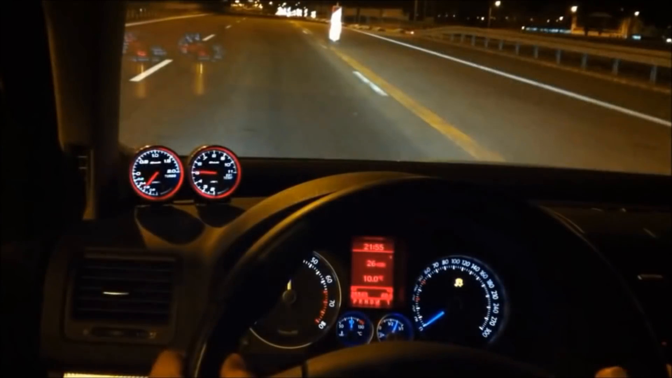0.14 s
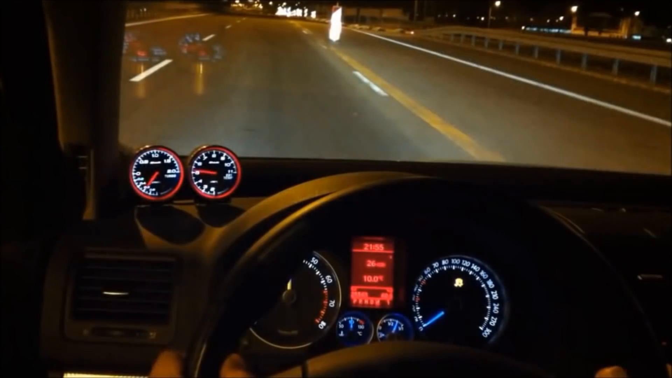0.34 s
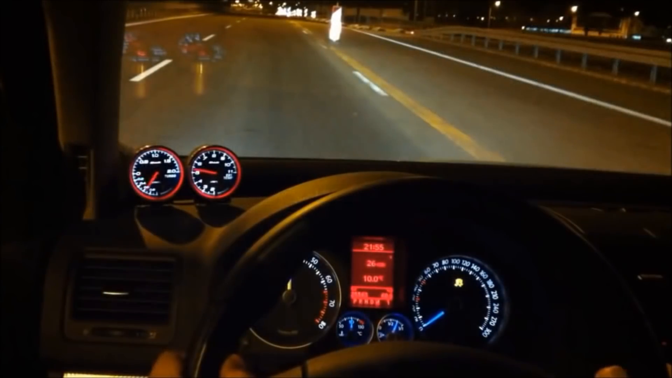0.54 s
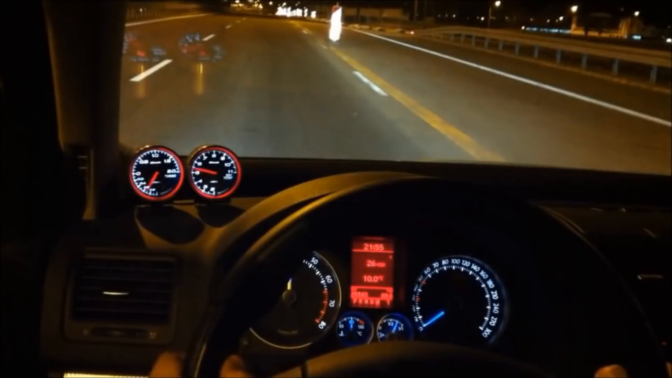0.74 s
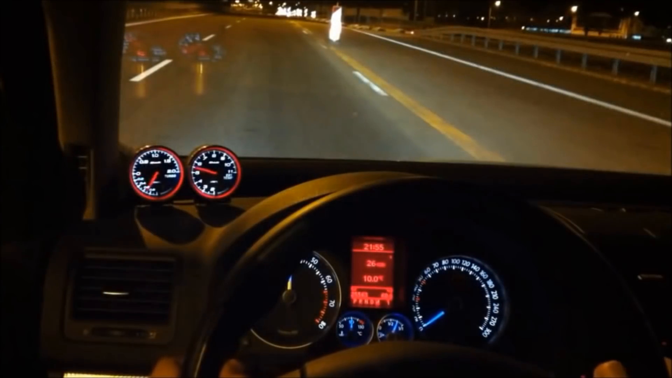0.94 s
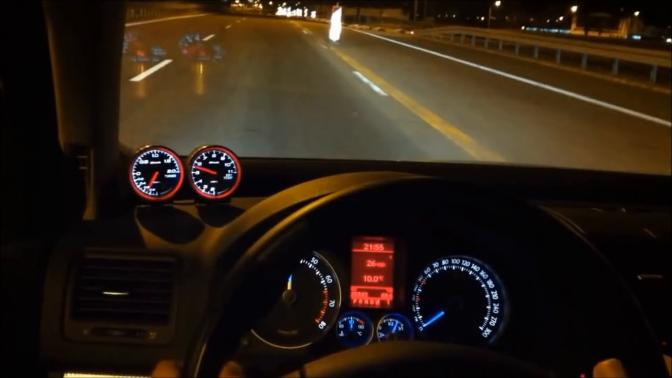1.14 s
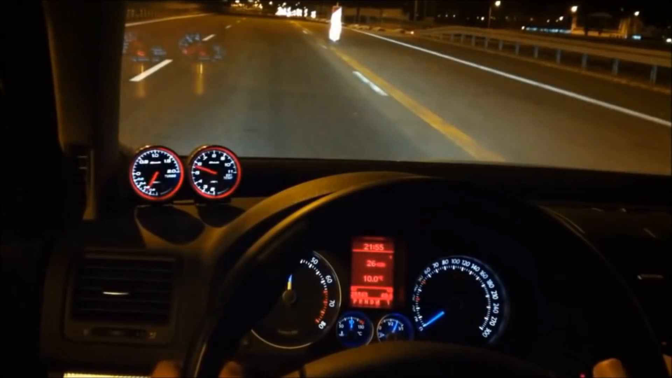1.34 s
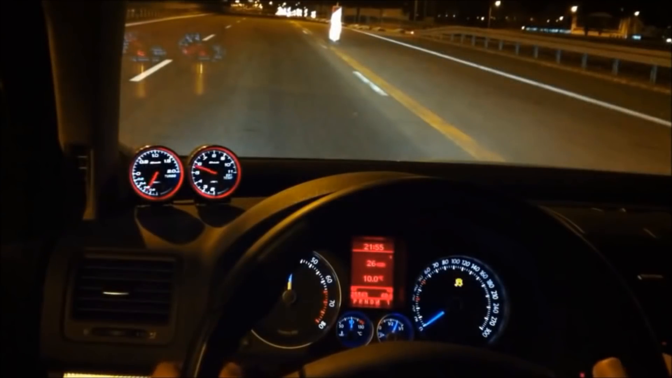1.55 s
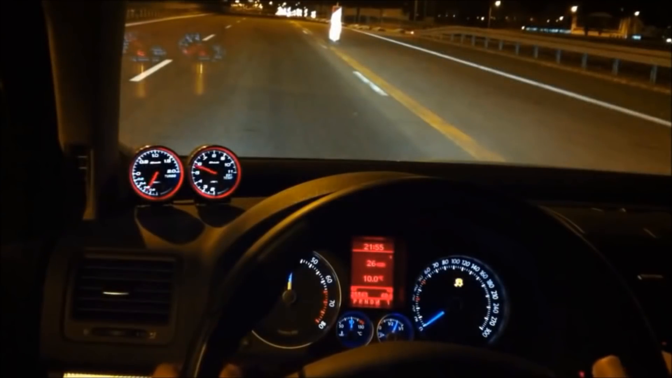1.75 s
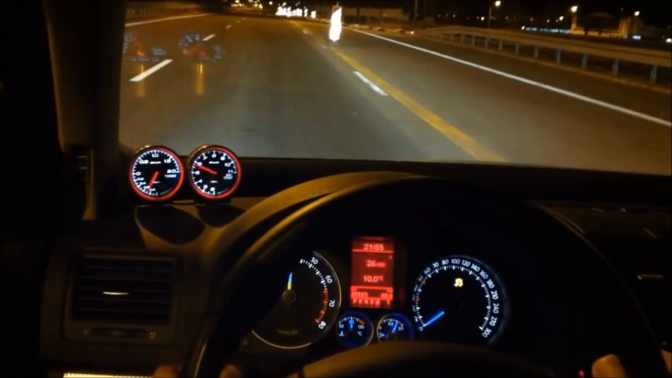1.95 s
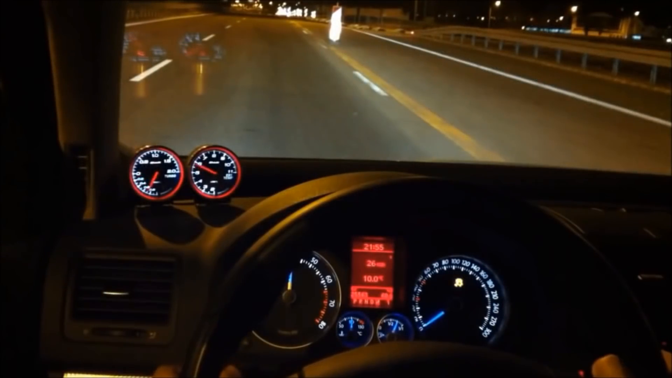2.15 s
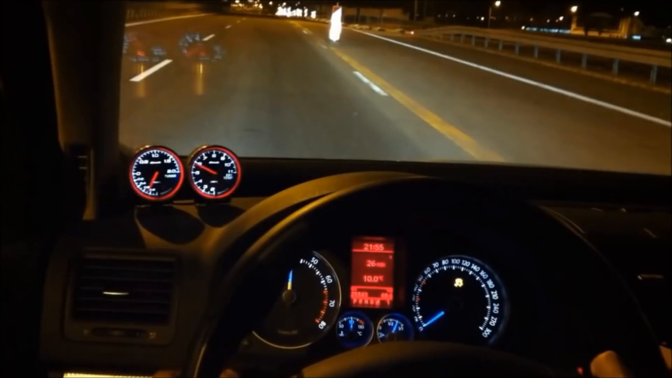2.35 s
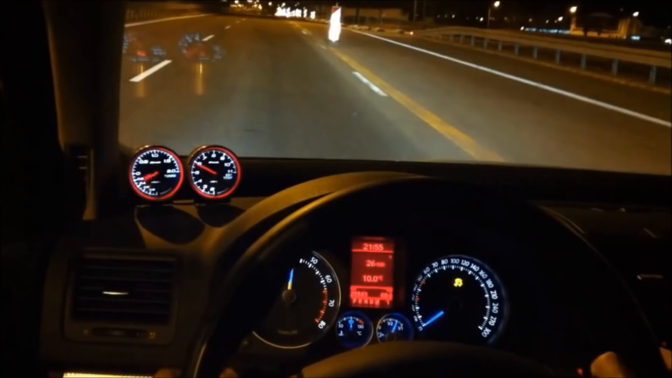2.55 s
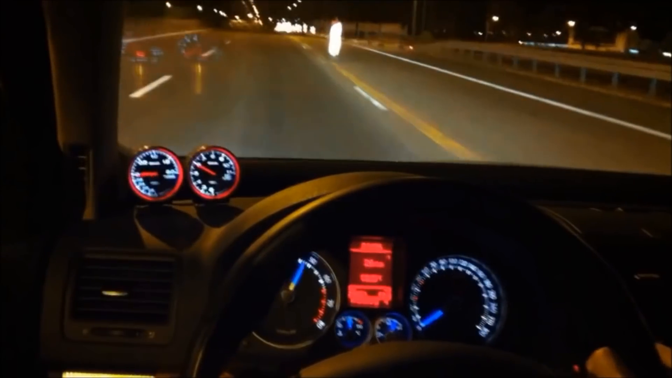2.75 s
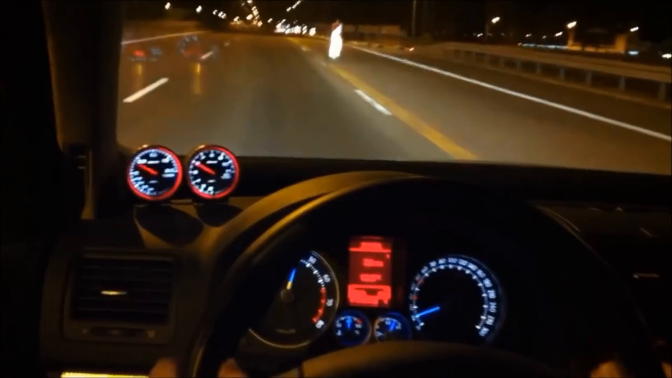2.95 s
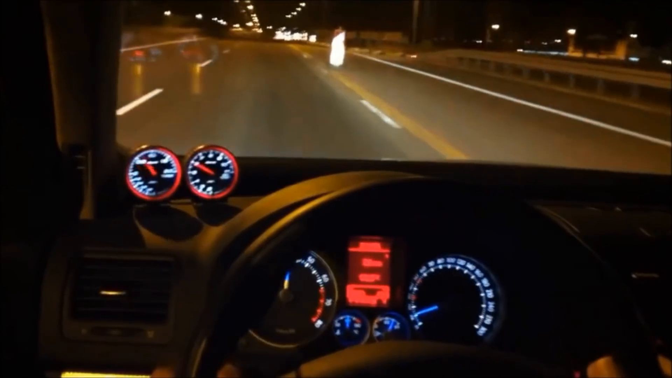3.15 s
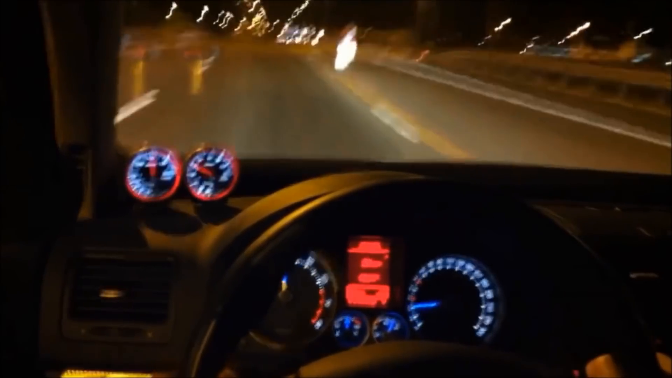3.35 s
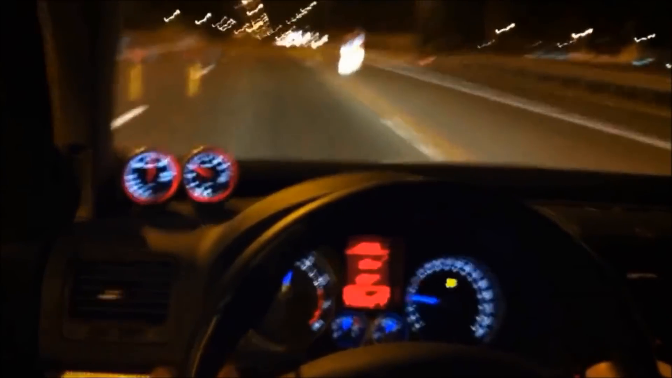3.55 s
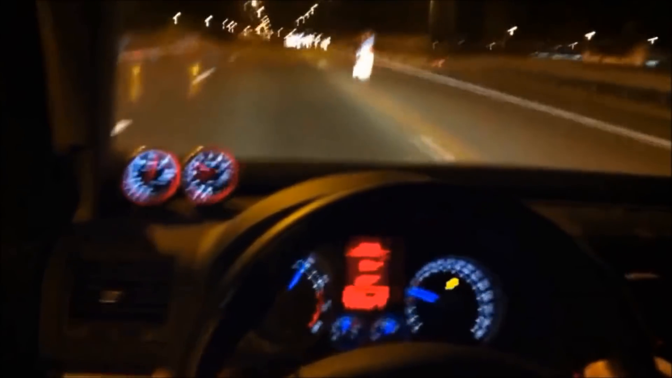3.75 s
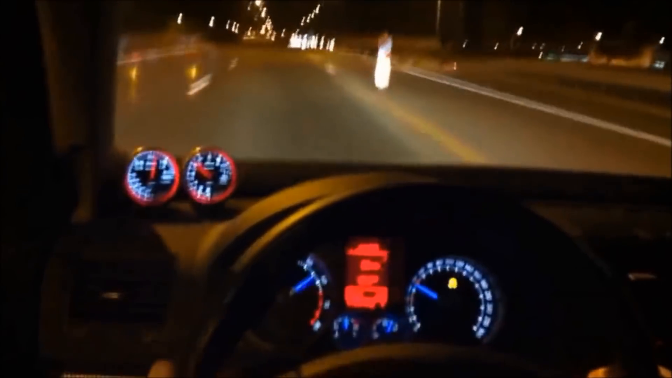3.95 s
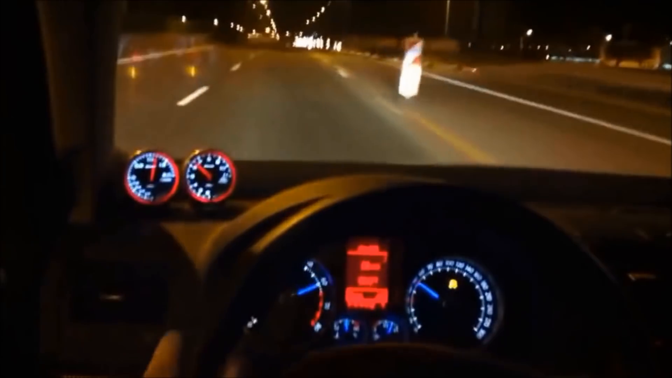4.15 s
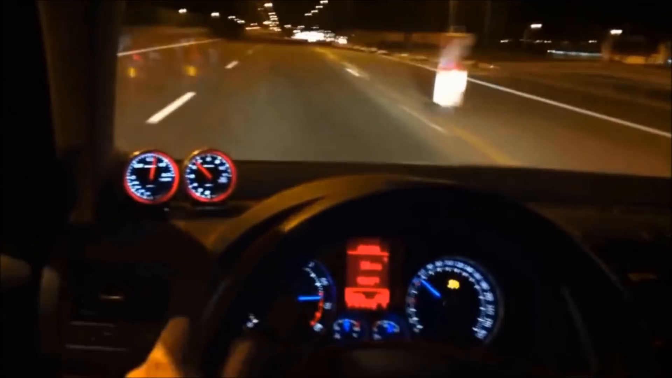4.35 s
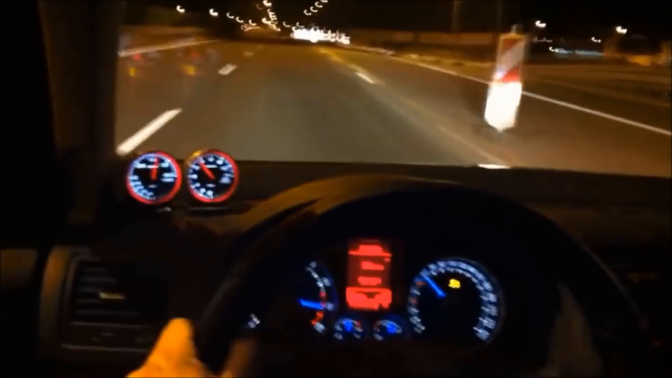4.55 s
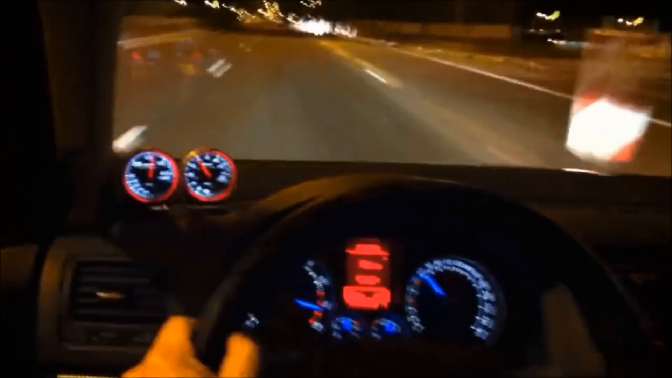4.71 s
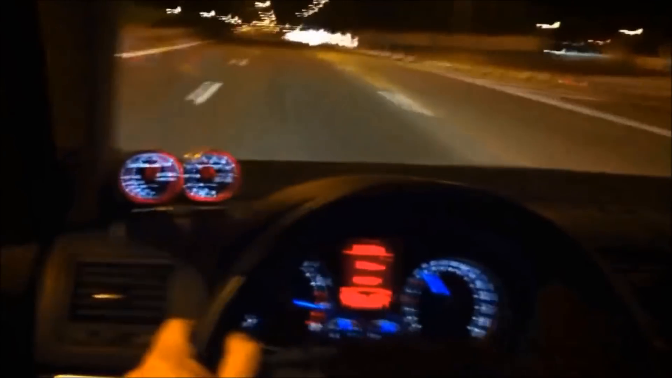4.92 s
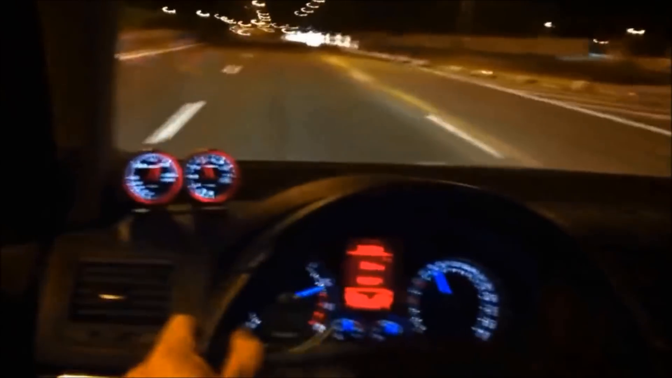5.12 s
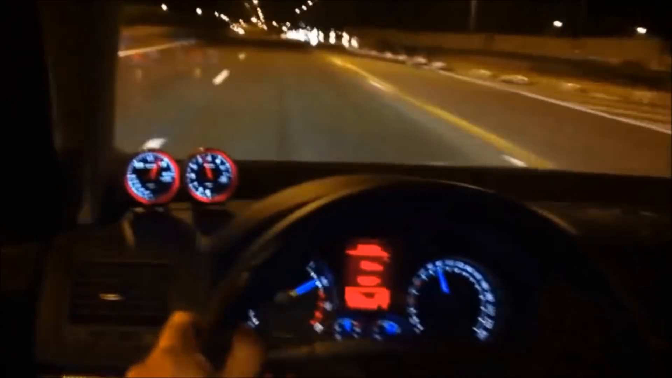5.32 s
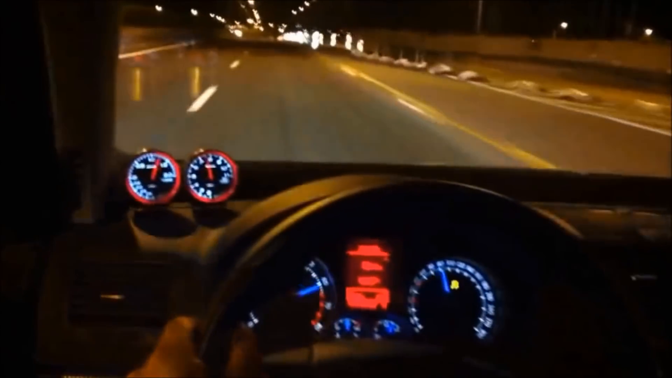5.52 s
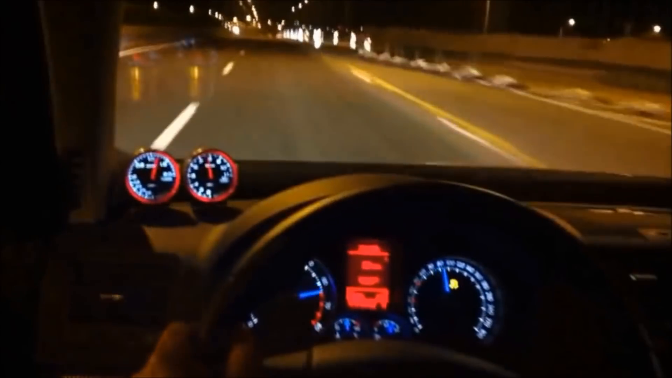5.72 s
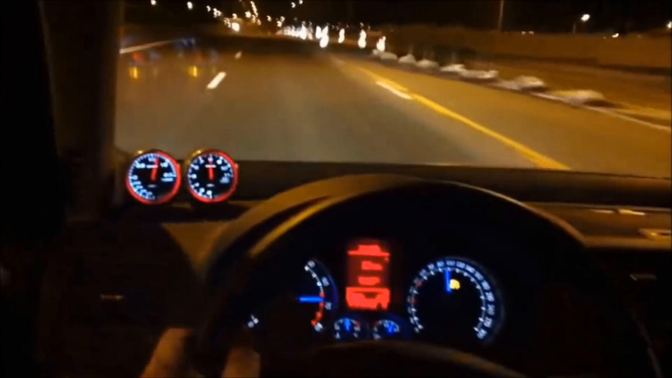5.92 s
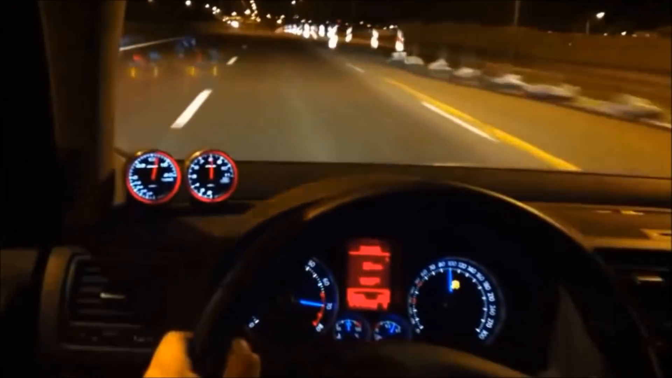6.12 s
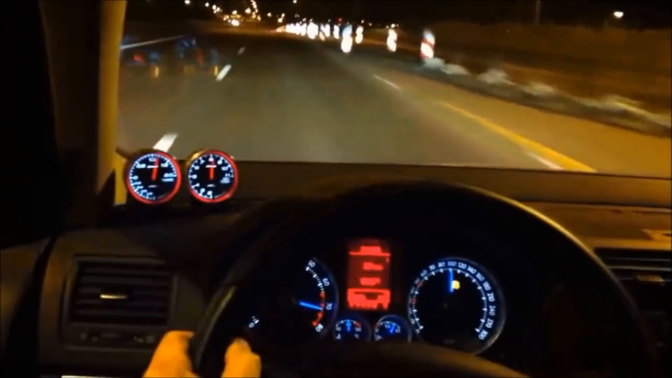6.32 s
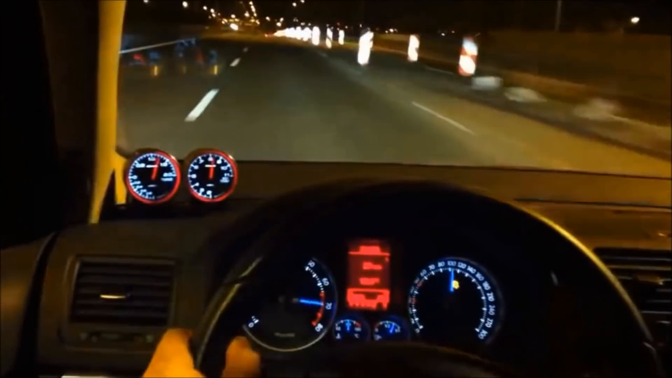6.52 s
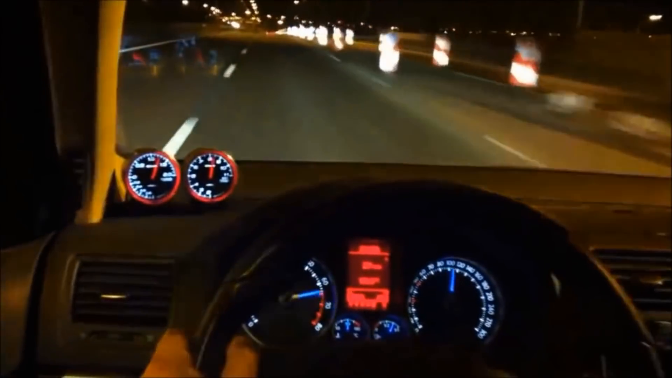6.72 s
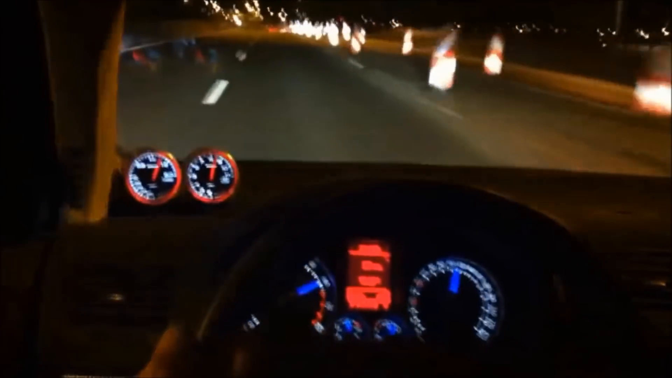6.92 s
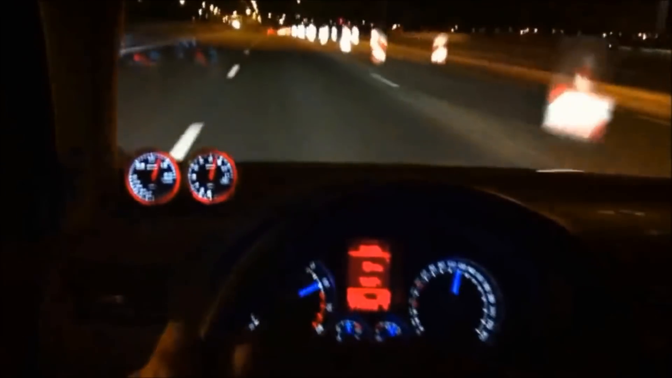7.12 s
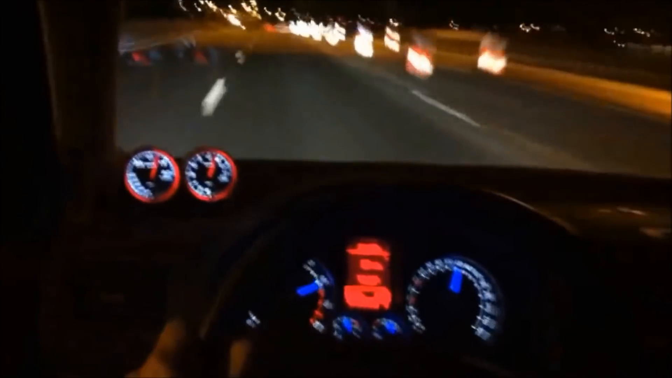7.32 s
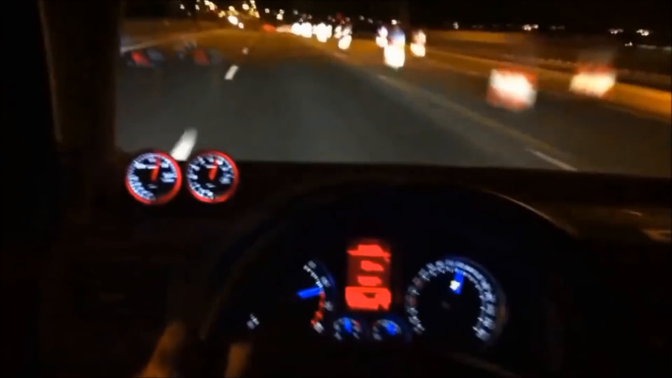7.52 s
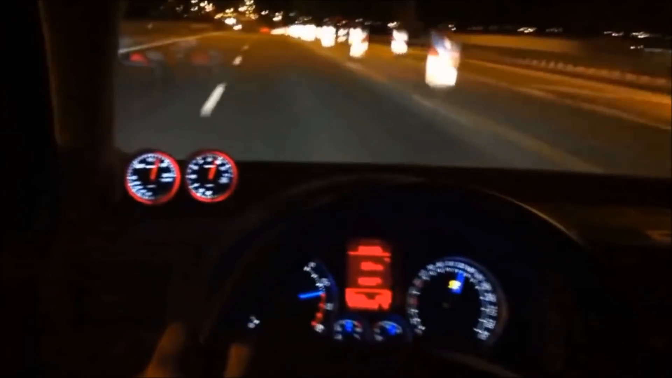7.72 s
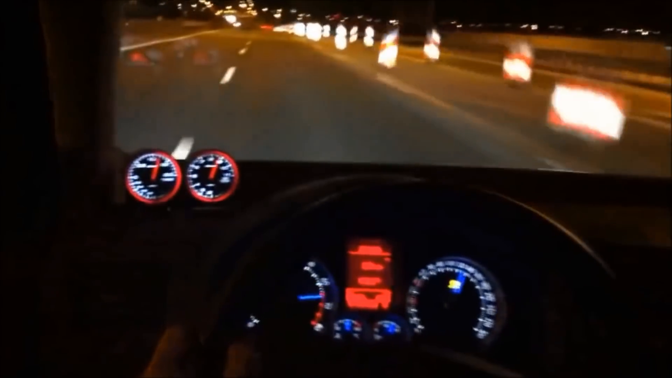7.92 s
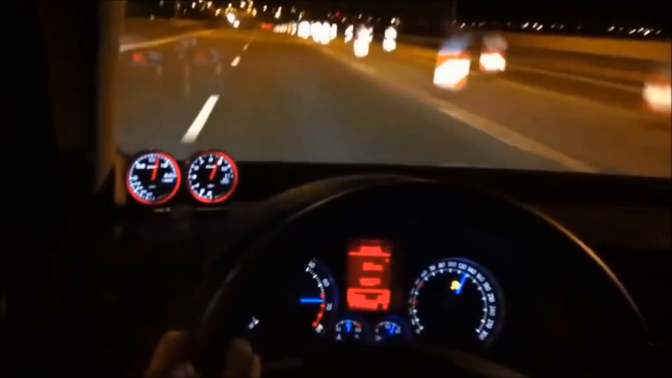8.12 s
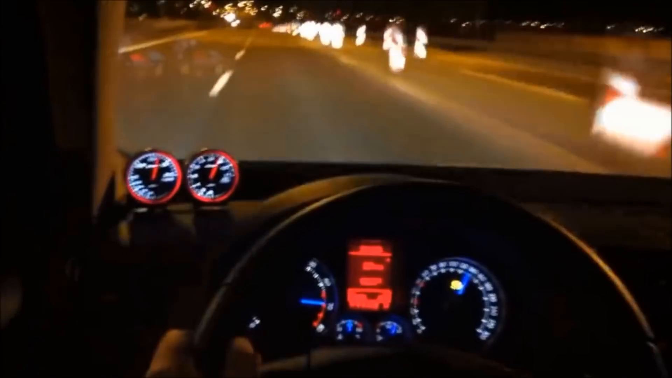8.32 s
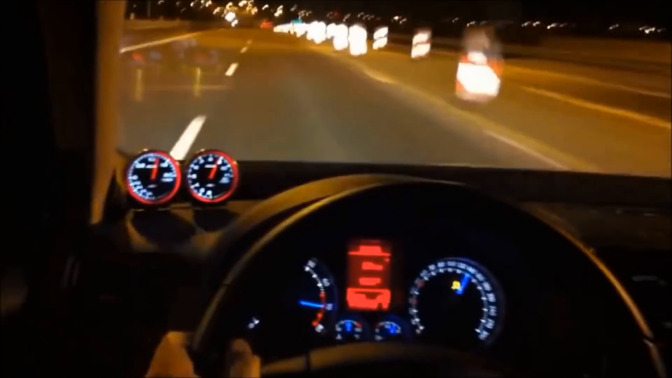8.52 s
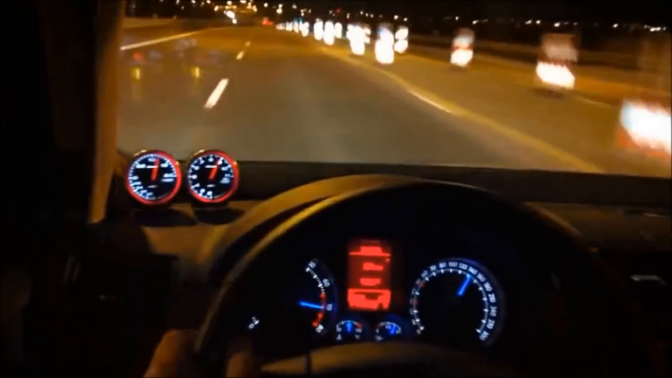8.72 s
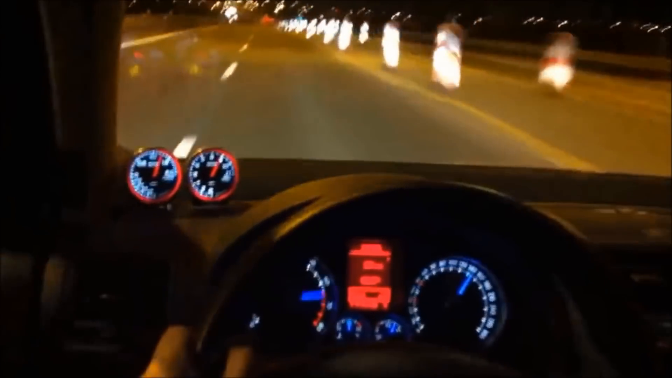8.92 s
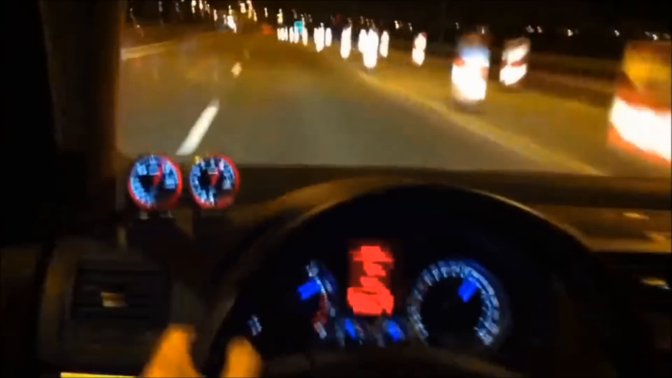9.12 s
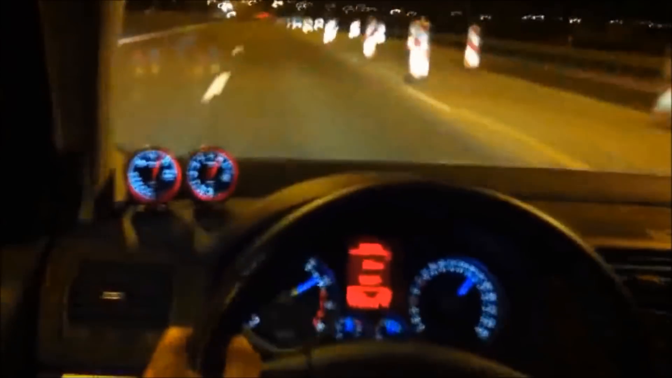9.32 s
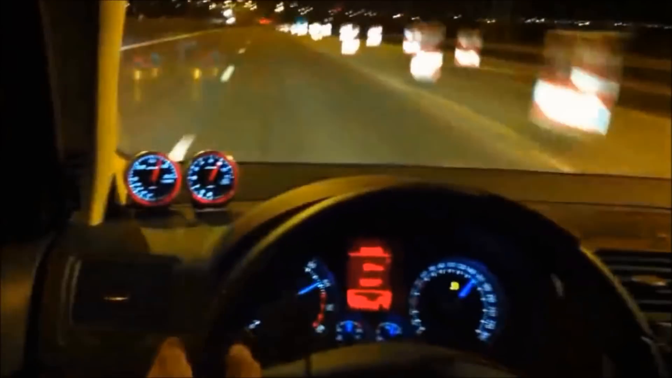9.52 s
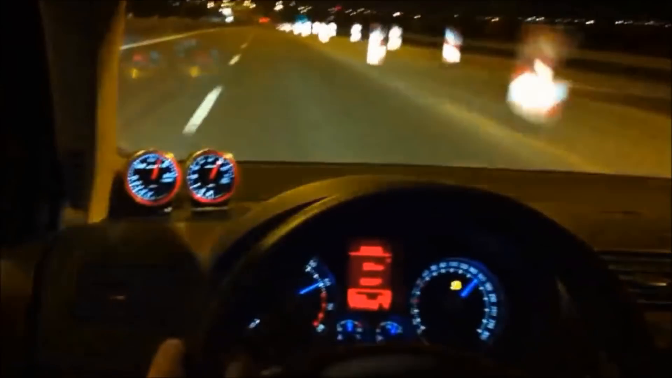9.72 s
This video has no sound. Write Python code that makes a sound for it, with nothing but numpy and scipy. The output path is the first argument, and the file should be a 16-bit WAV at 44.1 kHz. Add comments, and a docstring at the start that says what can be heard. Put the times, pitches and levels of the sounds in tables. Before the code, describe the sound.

A steady, booming engine drone fills a car's cabin, close around the microphone. After a few dry knocks from the controls, the car lurches away with low shudders and rattling trim. The engine falters, pops, then climbs to its limit, where the exhaust bangs several times. Three gear changes follow, the pitch dropping and rising again each time, over swelling road rumble, rushing air and a very faint turbo whistle.

```python
"""A turbocharged six-cylinder car launches at night; one microphone inside, at the driver's seat.
First the engine is held at 4000 rpm, its exhaust booming in the cabin. The controls knock within reach,
and at 2.6 s the car is let go: the body shudders, loose trim buzzes and the engine bogs, stutters and bangs.
It spins up to the rev limiter, where unburnt fuel bangs in the exhaust again. From 5 s it pulls through
three upshifts, while road noise grows around the seat and the turbo whistles faintly."""
import sys
import numpy as np
from scipy import signal
from scipy.fft import rfft, irfft, next_fast_len
from scipy.io import wavfile
from scipy.ndimage import uniform_filter1d, minimum_filter1d

SR = 44100
rng = np.random.default_rng(int(sys.argv[2]) if len(sys.argv) > 2 else 0)


def wrap_up_sound(samples):
    """Save the sound to the file named by the first command line argument, as 16-bit audio."""
    columns = np.atleast_2d(samples).T
    # keep every value between -1 and 1, then stretch to whole-number steps
    tamed = np.clip(columns, -1, 1)
    steps = np.round(tamed * 32767).astype(np.int16)
    wavfile.write(sys.argv[1], SR, steps)


N = 434826
TIME = np.arange(N) / SR
HOLD_HZ = 200   # firings per second at 4000 rpm

# Firing tone at the seat while the car stands: time_s, level_db
HELD_BOOM = [(0, -23.5), (.25, -18.5), (1.05, -26), (2.2, -26), (2.62, -26)]
# Exhaust resonances under load, heard from the seat: pitch_hz, level_db
PIPE_RESPONSE = [(125, -13), (150, -16), (192, -9.5), (203, -10.5), (211, -28), (220, -22), (227, -11),
                 (237, -4.5), (255, -9.5), (273, -12.5), (290, -6.5), (316, -10), (345, -6.5), (365, -11.5),
                 (385, -5.5), (410, -19), (500, -17.5), (550, -20), (572, -20.5), (620, -32), (695, -27),
                 (740, -34)]
# Strong multiples of the four-stroke cycle, relative levels: multiple, held_db, off_boost_db, on_boost_db
CYLINDER_ORDERS = [(4, -12.5, -13.5, -15.5), (5, -27, -22.5, -15), (7, -12, -10.5, -12), (8, -23, -11, -20),
                   (12, -15, -8, -6.5)]
def exhaust_boom(angle, firing_hz, moving, boost, stutter, loss_db, throb_db=2.2, held_follow=.24):
    """Six firings a cycle make the tone, unequal cylinders throb against it; all swell at pipe resonances."""
    held_db, = in_time(HELD_BOOM)
    firing_db = held_db * (1 - moving) + at_hz(PIPE_RESPONSE, firing_hz) * moving - loss_db
    firing_gain = from_db(firing_db + .05 * drift(19))
    misfire = 1 + .5 * stutter * drift(66)
    out = firing_gain * misfire * np.cos(6 * angle)
    held_side_db = held_db[0] + held_follow * (held_db - held_db[0])
    for k, still_db, off_boost_db, on_boost_db in CYLINDER_ORDERS:
        pipe_db = at_hz(PIPE_RESPONSE, k * firing_hz / 6)
        loaded_db = pipe_db + off_boost_db * (1 - boost) + on_boost_db * boost
        level_db = (held_side_db + still_db) * (1 - moving) + loaded_db * moving
        # the two nearest stay in step with the firing; the others reach the seat by other paths
        lag = 0 if k in (5, 7) else 1.67 * drift(.4)
        gain = from_db(level_db + throb_db * drift(11))
        out += gain * np.cos(k * angle + lag + .4 * moving * drift(6.6))
    return np.sqrt(2) * out


# Engine held, bogging and spinning up in first gear: time_s, firing_hz
FIRST_GEAR = [(0, 194), (.2, 200), (1, 198.5), (2.3, 202.5), (2.64, 200), (2.73, 217), (2.82, 243),
              (2.98, 221), (3.16, 213), (3.33, 195), (3.53, 189), (3.72, 226), (4.07, 281), (4.34, 303),
              (4.44, 326), (4.72, 358), (4.95, 355)]
# Upshifts, with the rates each gear starts from and reaches: start_s, clutch_slip_s, low_hz, high_hz
UPSHIFTS = [(5.02, .34, 287, 358), (6.5, .57, 290, 353), (8.81, .47, 281, 292)]
def engine_speed(recover_s=.09, pull_bow=.4):
    """Each shift drags the revs down; they climb back ever more slowly. Gives firing_hz and slip 0-1."""
    firing_hz, = in_time(FIRST_GEAR)
    slipping, top_hz = np.zeros(N), FIRST_GEAR[-1][1]
    ends = [row[0] for row in UPSHIFTS[1:]] + [N / SR]
    for (start_s, slip_s, low_hz, high_hz), end_s in zip(UPSHIFTS, ends):
        pull_s = start_s + slip_s + recover_s
        slip, pull = ramp(start_s, slip_s), ramp(pull_s, end_s - pull_s)
        firing_hz += (low_hz - top_hz) * np.sin(np.pi * slip / 2) ** 2
        firing_hz += (high_hz - low_hz) * pull * (1 + pull_bow * (1 - pull))
        slipping += np.sin(np.pi * slip) ** 2
        top_hz = high_hz
    return uniform_filter1d(firing_hz, size=SR // 20), slipping   # the flywheel rounds every change


# Cuts of the ignition: start_s, length_s, roughness (0-1), loss_db
IGNITION_CUTS = [(3.47, 0.15, 0.4, 0), (3.59, 0.15, 0.9, -3), (4.7, 0.284, 0.8, 4), (4.92, 0.29, 0, 2)]
def ignition_cuts(edge_s=.026):
    """With its spark cut the engine stutters. Gives the roughness and the dB the firing tone loses."""
    stutter, loss_db = np.zeros(N), np.zeros(N)
    for start_s, length_s, roughness, db in IGNITION_CUTS:
        window = ramp(start_s, edge_s) - ramp(start_s + length_s - edge_s, edge_s)
        stutter += roughness * window
        loss_db += db * window
    return stutter, loss_db


# Weaker multiples of the cycle, relative levels: multiple, held_db, driving_db
GROWL_ORDERS = [(2, -55, -36.5), (3, -48, -25), (9, -35.5, -34.5), (10, -48.5, -33), (11, -29, -34),
                (13, -50, -39.5), (14, -37.5, -38), (15, -47, -44), (16, -50.5, -41.5), (17, -51.5, -46.5),
                (18, -58, -38.5), (19, -46, -41), (20, -50.5, -49.5), (21, -69, -54), (22, -53.5, -53.5),
                (23, -65, -58.5), (24, -51, -49), (25, -55, -55.5), (26, -68, -55), (27, -70, -58.5),
                (28, -76.5, -59), (29, -82, -58.5), (30, -59, -52.5), (31, -56, -60.5), (32, -61.5, -62)]
# Cabin modes at the microphone: pitch_hz, gain_db
CABIN_RESPONSE = [(97, -5.5), (118, 8.5), (135, 7), (160, -1), (178, 1.5), (210, 5), (430, -2.5),
                  (500, 3.5), (545, -0.5), (580, 4.5), (625, -11), (700, -1.5), (770, -1.5), (850, -0.5)]
def engine_growl(angle, firing_hz, moving, held_trim_db=-3.5, driving_trim_db=-2):
    """The weaker multiples swell and fade as they sweep across the modes of the cabin."""
    waver_db = .3 + 2.7 * moving
    out = np.zeros(N)
    for k, held_db, driving_db in GROWL_ORDERS:
        swept_db = driving_db + driving_trim_db + at_hz(CABIN_RESPONSE, k * firing_hz / 6)
        if k < 4:   # imbalance grows steeply with speed
            swept_db += 32 * np.log2(firing_hz / 330)
        level_db = (held_db + held_trim_db) * (1 - moving) + swept_db * moving + waver_db * drift(8.3)
        phase = rng.uniform(0, 2 * np.pi) + .4 * moving * drift(5.7)
        out += from_db(level_db) * np.cos(k * angle + phase)
    return np.sqrt(2) * out


# Bangs in the exhaust, heard from inside: start_s, thud_db, crack_db
BANGS = [(3.52, -20, -30.5), (3.631, -19, -35), (4.617, -9.5, -28), (4.752, -17, -23), (4.772, -22, -33),
         (4.839, -26.5, -42), (4.904, -10.5, -31.5), (4.918, -16, -17), (5.121, -26, -39),
         (7.943, -21, -22)]
# Spectra of the thud and the crack: frequency_hz, level_db
THUD_COLOUR = [(25, -18.5), (60, -17.5), (110, 9), (250, -9), (450, 14), (800, -37)]
CRACK_COLOUR = [(300, -4.5), (700, -4), (1050, 12), (1250, -4), (1500, -17.5), (2400, -15.5), (4500, -25),
                (7000, -37)]
def exhaust_bangs(rise_s=.0015):
    """Unburnt fuel goes off with a thud and a hollow crack, each with a soft onset."""
    start_s, thud_db, crack_db = np.transpose(BANGS)
    crack = lagged(lagged(decays(start_s, crack_db, t60_s=.1), rise_s), rise_s)
    thud = lagged(lagged(decays(start_s, thud_db, t60_s=.095), rise_s), rise_s)
    return low_cut(crack * noise(CRACK_COLOUR) + thud * noise(THUD_COLOUR))


# The drivetrain takes up load: start_s, pitch_hz, level_db
JOLTS = [(2.63, 103.6, -27), (3.09, 90.3, -20.5), (3.48, 124.8, -13.5), (3.97, 135, -18),
         (4.73, 119, -16.5)]
def body_shudder(rise_s=.045):
    """Each jolt sets a low mode of the body booming around the seat; it swells, wavers and dies."""
    out = np.zeros(N)
    for start_s, pitch_hz, level_db in JOLTS:
        age = np.maximum(TIME - start_s, 0) / rise_s
        swell = (age * np.exp(1 - age)) ** 2
        out += from_db(level_db) * swell * np.sin(2 * np.pi * pitch_hz * TIME + .59 * drift(8.6))
    return np.sqrt(2) * out


# Rumble of the body, all around the microphone: frequency_hz, level_db
RUMBLE_COLOUR = [(25, -38), (55, -34.5), (75, -27), (100, -3), (180, 0), (260, 0.5), (360, 3), (470, -4),
                 (650, -13), (900, -24), (1500, -48)]
def body_rumble(moving, road, stutter, held_db=-36, driving_db=-24):
    """Ragged combustion and the road shake the body: more with speed, most when the engine stutters."""
    level_db = held_db * (1 - moving) + driving_db * moving + 4 * road + 6 * stutter
    return from_db(level_db - .1 * drift(1.9)) * noise(RUMBLE_COLOUR)


# Exhaust turbulence, heard through the body: frequency_hz, level_db
ROAR_COLOUR = [(350, -11.5), (600, 2), (850, 2.5), (1150, -2.5), (1400, -7.5), (1700, -10.5), (2100, -28),
               (3500, -44.5)]
def exhaust_roar(octaves, moving, boost, road, stutter, held_db=-54, driving_db=-44):
    """Turbulence in the exhaust grows with boost, revs and road speed, and flares in a stutter."""
    base_db = held_db * (1 - moving) + driving_db * moving
    flare_db = 4.5 * boost + 4 * octaves + 6 * road + 3 * stutter
    return from_db(base_db + flare_db + drift(25)) * noise(ROAR_COLOUR)


# Knocks of the controls, at arm's length: start_s, level_db
KNOCKS = [(2.251, -41), (2.359, -32), (2.5445, -21), (2.5854, -37)]
# Spectrum of a knock: frequency_hz, level_db
KNOCK_COLOUR = [(150, 5), (400, 9), (750, 11), (1100, 5), (1600, -4), (3000, -9.5), (6000, -19),
                (15000, -31)]
def control_knocks(tail_db=-20):
    """The controls knock dryly, each leaving a faint tail in the cabin."""
    start_s, level_db = np.transpose(KNOCKS)
    contact = decays(start_s, level_db, t60_s=.035)
    tail = from_db(tail_db) * decays(start_s, level_db, t60_s=.49)
    return low_cut((contact + tail) * noise(KNOCK_COLOUR))


# Loose trim buzzing close to the microphone: start_s, length_s, relative_db
BUZZES = [(2.775, .04, -21.5), (2.91, .025, -25), (2.96, .02, -24), (3.096, .035, -23), (3.135, .052, -20),
          (3.554, .02, -22.5), (3.625, .08, -22), (3.783, .022, -26), (3.918, .015, -29.5),
          (4.008, .015, -28), (4.57, .02, -28), (4.96, .03, -25), (5.225, .015, -24), (6.251, .03, -27.5),
          (7.97, .02, -23), (8.267, .04, -25.5), (8.93, .04, -27.5)]
def trim_buzz(angle, buzz_chance=.7, loose_chance=.15, loose_from_s=4.3):
    """A loose part taps on some crests of the boom: in bursts when jolted, in faint clusters at speed."""
    crests = np.flatnonzero(np.diff(np.floor(6 * angle / (2 * np.pi))) > 0)
    crest_s = TIME[crests]
    chance = loose_chance * from_db(6 * drift(5))[crests] * (crest_s > loose_from_s)
    relative_db = np.full(len(crests), -30.)
    for start_s, length_s, db in BUZZES:
        inside = (crest_s >= start_s) & (crest_s < start_s + length_s)
        chance[inside], relative_db[inside] = buzz_chance, db
    touches = rng.random(N)[crests] < chance
    tap_db = relative_db + 1.6 * np.clip(rng.standard_normal(N)[crests], -2, 1)
    scrapes = .619 * decays(crest_s[touches], tap_db[touches], t60_s=.01) * rng.standard_normal(N)
    bright = resonance(scrapes, 5100, 950) - resonance(scrapes, 5950, 1100)
    return bright + .5 * resonance(scrapes, 2200, 500)


# Things sliding and rubbing near the seat: start_s, length_s, relative_db, treble_db
RUSTLES = [(2.246, .025, -47, -3), (2.328, 0.1, -49, -7), (2.5, .12, -50.5, -6), (2.72, 0.37, -50, 1.5),
           (3.043, 0.24, -47.5, -1), (3.37, 0.27, -53.5, 7), (3.55, 0.24, -43.5, -8), (3.6, 0.049, -49, -3),
           (3.905, 0.077, -53.5, 3), (4.7, 0.037, -52, 3), (4.929, 0.15, -58, 1), (5.155, .03, -50, 1),
           (5.222, 0.046, -48, 2), (7.2, .35, -53.5, -4), (8.2, .3, -53.5, -2), (9.121, 0.3, -51.5, 0.5)]
# Spectrum of the rubbing: frequency_hz, level_db
RUSTLE_COLOUR = [(900, -15), (2000, 4.5), (4000, 0), (6000, -1.5), (9000, -2.5), (14000, -4.5), (16000, -6)]
def cabin_rustles(grain_db=5, treble_hz=7500):
    """Short gritty slides as the car lurches, some dull and some sizzling."""
    grit = rms_one(noise(RUSTLE_COLOUR) * from_db(grain_db * drift(250)))
    dull = signal.sosfilt(signal.butter(1, treble_hz, fs=SR, output="sos"), grit)
    sizzle = grit - dull
    out = np.zeros(N)
    for start_s, length_s, db, treble_db in RUSTLES:
        window = signal.windows.tukey(int(length_s * SR), .85)
        span = slice(int(start_s * SR), int(start_s * SR) + len(window))
        out[span] += from_db(db + 1) * window * (dull[span] + from_db(treble_db) * sizzle[span])
    return out


# Intake air, heard from the seat: frequency_hz, level_db
RUSH_COLOUR = [(1300, -11), (2000, 3.5), (2600, 0), (3500, -1), (4500, -3), (5500, -6.5), (7000, -12.5),
               (9500, -16.5), (12000, -23), (15500, -24)]
# Narrow rings of the body panels, excited by the rushing air: pitch_hz, width_hz, gain_db
PANEL_MODES = [(2710, 77, 1.5), (3090, 60, 2.5), (3590, 140, 1.5), (4280, 120, -2)]
def intake_rush(octaves, moving, road, slipping, held_db=-68, driving_db=-58):
    """Air rushes and sets the panels ringing: it rises steeply with the revs and flares at each shift."""
    stream = noise(RUSH_COLOUR)
    ringing = sum(from_db(db) * resonance(stream, hz, width_hz) for hz, width_hz, db in PANEL_MODES)
    level_db = held_db * (1 - moving) + driving_db * moving + 9.5 * octaves + 7 * road + 2 * slipping
    return from_db(level_db) * rms_one(noise(RUSH_COLOUR) + ringing)


# Valve and injector lines at held revs, faint at the seat: pitch_hz, relative_db
CLATTER_COLOUR = [(1050, -74.5), (1500, -77), (1850, -78), (2100, -78), (2450, -86), (2680, -83),
                  (3000, -82), (3600, -86.5)]
# Ringing lines of the valve train and chain: multiple, relative_db
WHINES = [(38, -66.5), (41, -67), (45, -67.5), (47, -71), (50, -70.5), (60, -76), (62, -68), (64, -75),
          (66, -73.5), (80, -73.5), (81, -72.5), (96, -78)]
def valve_clatter(angle, firing_hz, octave_db=13, waver_db=3.2):
    """Valves and injectors repeat one pattern a cycle: a fine comb of high lines, a few ringing out."""
    multiples = np.arange(33, 108)
    lines_db = np.full(1025, -200.)
    lines_db[multiples] = at_hz(CLATTER_COLOUR, multiples * HOLD_HZ / 6)
    for multiple, db in WHINES:
        lines_db[round(multiple)] = db
    lines = from_db(lines_db) * np.exp(2j * np.pi * rng.random(len(lines_db)))
    cycle = irfft(lines) * (len(lines) - 1) * np.sqrt(2)
    pattern = np.interp(angle / (2 * np.pi) % 1, np.arange(len(cycle)) / len(cycle), cycle)
    gain_db = -2.5 + octave_db * np.log2(firing_hz / firing_hz[0]) + waver_db * drift(3.1)
    return from_db(gain_db) * pattern


def turbo_whistle(octaves, boost, road, base_hz=9750, blur_hz=170, flicker_db=3.5):
    """The compressor's blade tone trails the revs and swells with them, shaken by turbulent air."""
    spin = lagged(octaves, lag_s=.12)
    pitch_hz = base_hz * 2 ** (.35 * spin) + blur_hz * drift(150)
    level_db = -88 + 21 * spin + 4 * road + flicker_db * drift(10)
    return boost * from_db(level_db) * np.sin(2 * np.pi * np.cumsum(pitch_hz) / SR)


# Background hiss at the microphone: frequency_hz, level_db
HISS_COLOUR = [(500, 4.5), (3000, 8), (5000, 0), (8000, -2.5), (15500, -7)]
def hiss(level_db=-60):
    """A faint, steady hiss lies behind everything."""
    return from_db(level_db) * noise(HISS_COLOUR)


def from_db(db):
    """Decibels to gain."""
    return 10 ** (np.asarray(db) / 20)


def rms_one(x):
    """Scale to unit rms."""
    return x / np.sqrt(np.mean(x ** 2) + 1e-20)


def ramp(start_s, length_s):
    """Rises evenly from 0 to 1."""
    return np.clip((TIME - start_s) / length_s, 0, 1)


def in_time(rows):
    """Each column of a curve, sample by sample."""
    time_s, *columns = np.transpose(rows)
    return [np.interp(TIME, time_s, column) for column in columns]


def at_hz(spectrum, hz):
    """Read a spectrum on a log-frequency axis."""
    frequency_hz, level_db = np.transpose(spectrum)
    return np.interp(np.log(hz), np.log(frequency_hz), level_db)


def drift(rate_hz):
    """Smooth random wander of spread 1, drawn every 40 samples."""
    r = np.exp(-2 * np.pi * rate_hz * 40 / SR)
    slow = signal.lfilter([1], [1, -2 * r, r * r], rng.standard_normal(N // 40 + 2002))[2000:]
    return np.interp(np.arange(N) / 40, np.arange(len(slow)), rms_one(slow))


def noise(colour):
    """Noise of a given colour that falls away beyond its ends; rms 1."""
    size = next_fast_len(N)
    hz = np.maximum(np.arange(size // 2 + 1) * SR / size, 1)
    ends = 1 / (1 + (colour[0][0] / hz) ** 8) / (1 + (hz / colour[-1][0] / 2) ** 8)
    spectrum = rfft(rng.standard_normal(size)) * from_db(at_hz(colour, hz)) * ends
    return rms_one(irfft(spectrum, size)[:N])


def resonance(x, hz, width_hz):
    """Two-pole resonance with gain 1 on top."""
    r = np.exp(-np.pi * width_hz / SR)
    feedback = [1, -2 * r * np.cos(2 * np.pi * hz / SR), r * r]
    return signal.lfilter(np.array([1, 0, -1]) * (1 - r * r) / 2, feedback, x + 1e-18)


def lagged(x, lag_s):
    """Follow x with a one-pole lag."""
    r = np.exp(-1 / (lag_s * SR))
    return signal.lfilter([1 - r], [1, -r], x)


def low_cut(x, hz=85):
    """Take out the deepest bass."""
    return signal.sosfilt(signal.butter(4, hz, "high", fs=SR, output="sos"), x)


def decays(start_s, level_db, t60_s):
    """An envelope that jumps at each blow and dies away."""
    kicks = np.zeros(N)
    kicks[(np.asarray(start_s) * SR).astype(int)] = from_db(level_db)
    return signal.lfilter([1], [1, -from_db(-60 / (t60_s * SR))], kicks + 1e-18)


def scene(release_s=2.56, clutch_s=.2, spool_s=3.2, spool_rise_s=.53):
    """The mix at the driver's seat; one crank angle drives the engine's tones and gas puffs."""
    firing_hz, slipping = engine_speed()
    octaves = np.log2(firing_hz / HOLD_HZ)
    moving, boost = ramp(release_s, clutch_s), ramp(spool_s, spool_rise_s)
    road = np.sqrt(ramp(spool_s, N / SR - spool_s))   # road speed 0-1 under steady power
    stutter, loss_db = ignition_cuts()
    angle = 2 * np.pi * np.cumsum(firing_hz / 6) / SR   # one turn per four-stroke cycle
    angle += (.0028 + .014 * moving + .11 * stutter) * drift(35)   # the crank turns unevenly
    engine = exhaust_boom(angle, firing_hz, moving, boost, stutter, loss_db)
    engine += engine_growl(angle, firing_hz, moving) + valve_clatter(angle, firing_hz)
    gas = exhaust_roar(octaves, moving, boost, road, stutter)
    gas += intake_rush(octaves, moving, road, slipping)
    # gas moves in a puff per firing, stronger once a cycle
    puffs = rms_one((1 + .21 * np.cos(6 * angle)) * (1 + .081 * np.cos(angle)))
    air = gas * puffs + turbo_whistle(octaves, boost, road) + hiss()
    cabin = body_rumble(moving, road, stutter) + trim_buzz(angle) + cabin_rustles() + body_shudder()
    return (engine + air + cabin + control_knocks() + exhaust_bangs())[None]


def record(dry, stop_hz=16300):
    """Behind the microphone a fast limiter holds the peaks at full scale; the top is cut."""
    window = SR // 200
    gain = uniform_filter1d(minimum_filter1d(1 / np.maximum(np.abs(dry), 1), window), window)
    return signal.sosfilt(signal.cheby2(16, 70, stop_hz, fs=SR, output="sos"), dry * gain)


dry = scene()
out = record(dry)
wrap_up_sound(out)
```